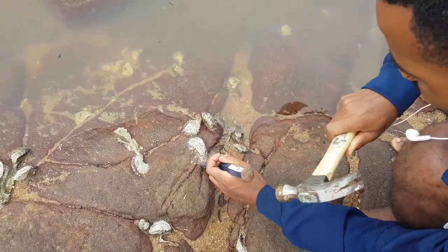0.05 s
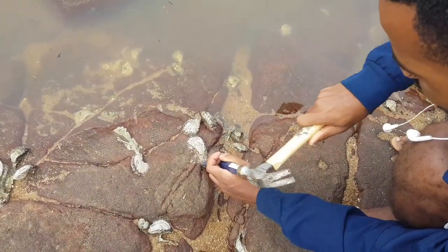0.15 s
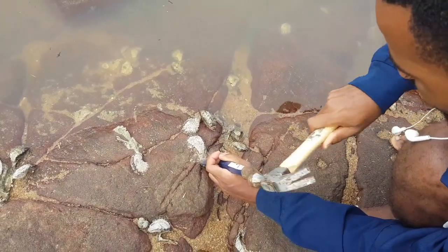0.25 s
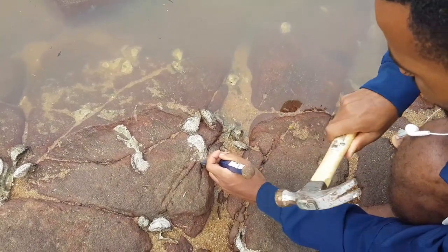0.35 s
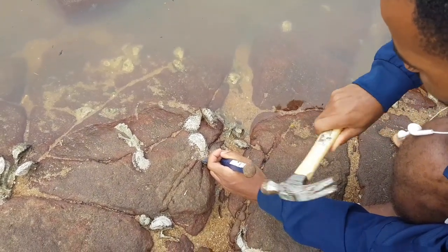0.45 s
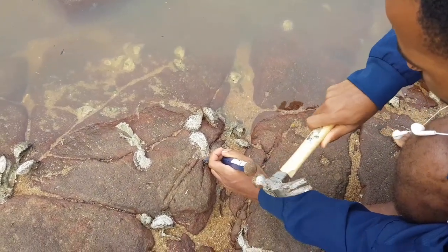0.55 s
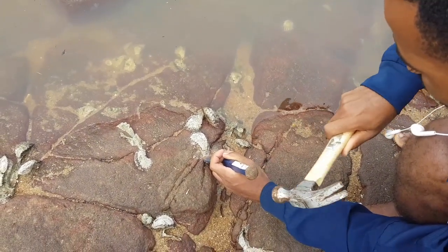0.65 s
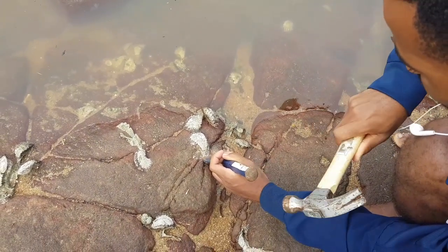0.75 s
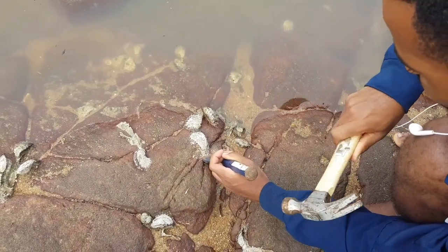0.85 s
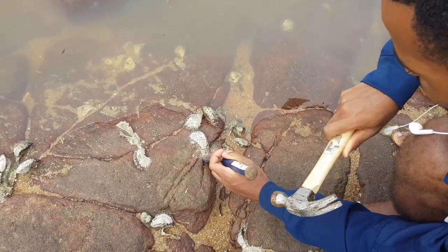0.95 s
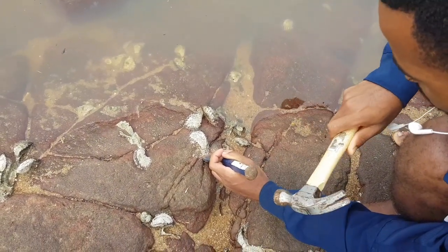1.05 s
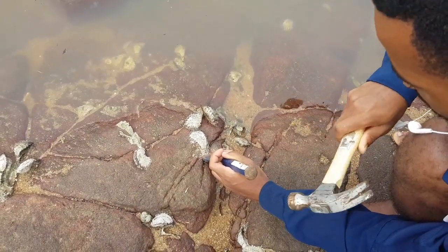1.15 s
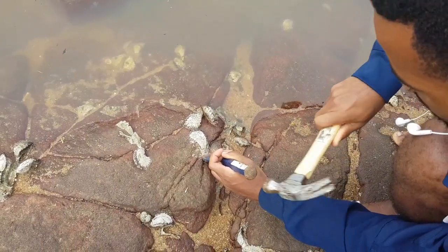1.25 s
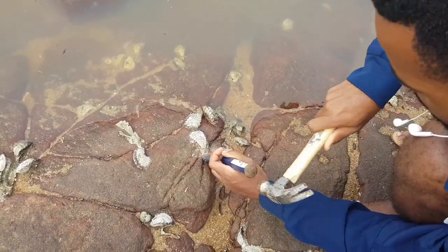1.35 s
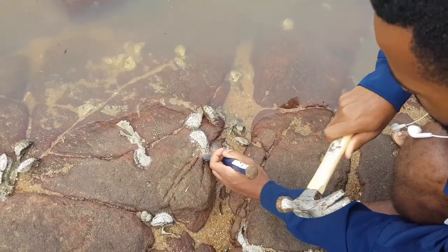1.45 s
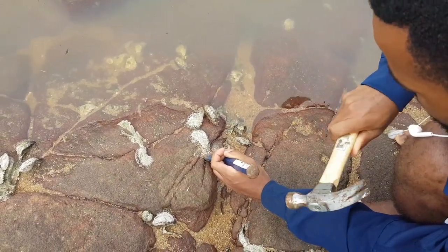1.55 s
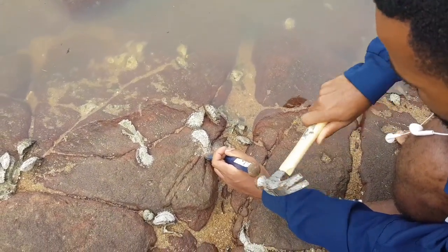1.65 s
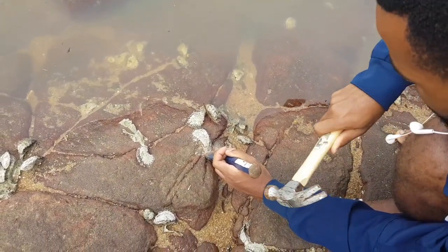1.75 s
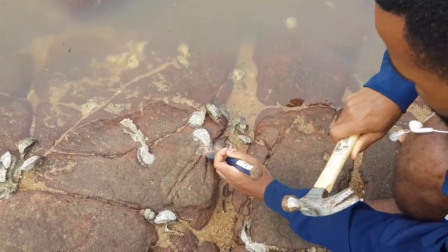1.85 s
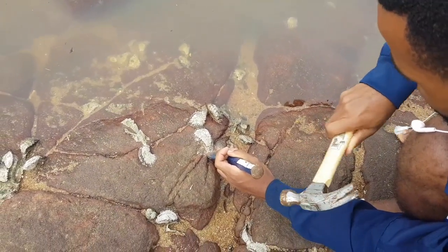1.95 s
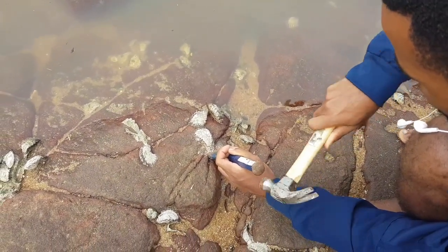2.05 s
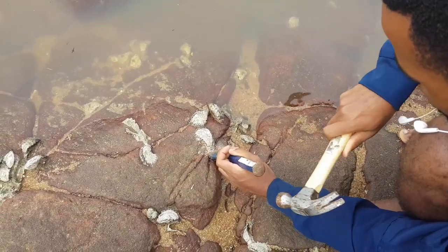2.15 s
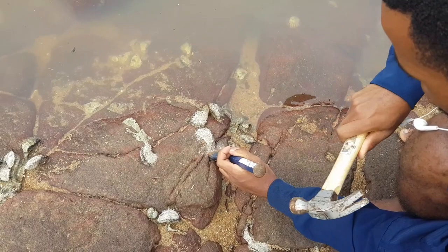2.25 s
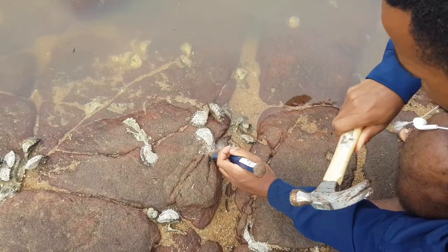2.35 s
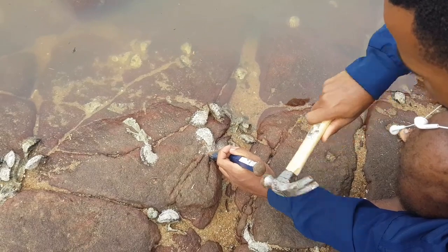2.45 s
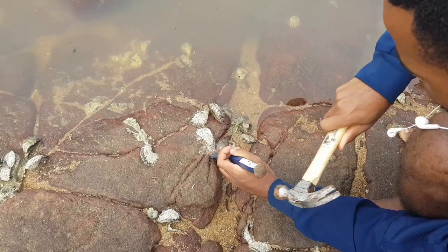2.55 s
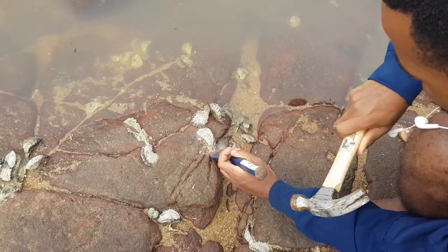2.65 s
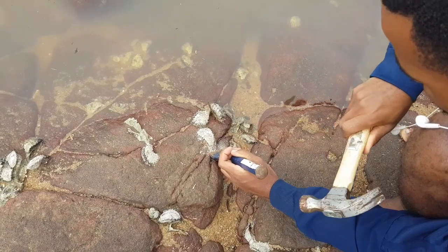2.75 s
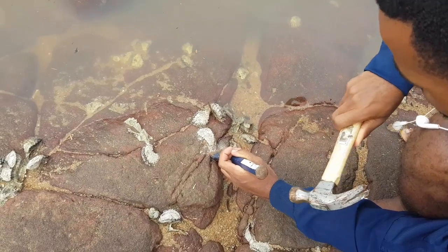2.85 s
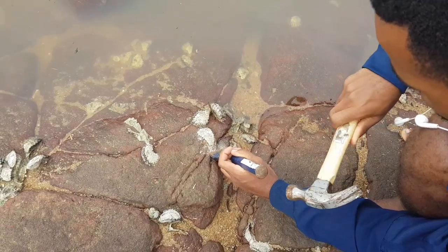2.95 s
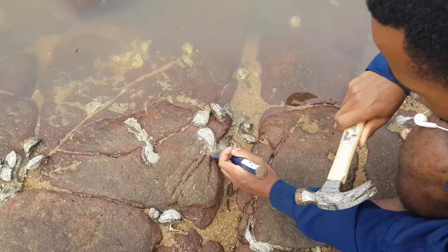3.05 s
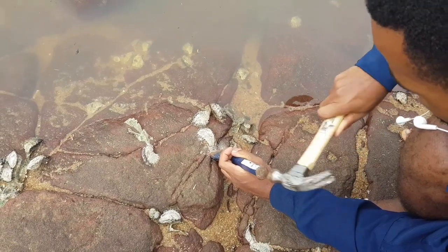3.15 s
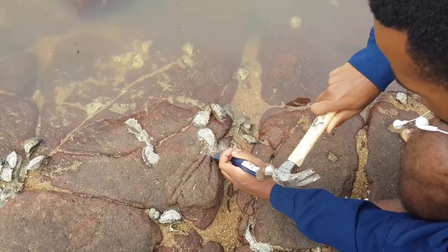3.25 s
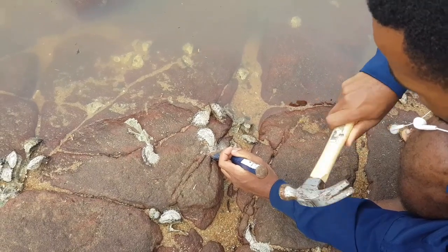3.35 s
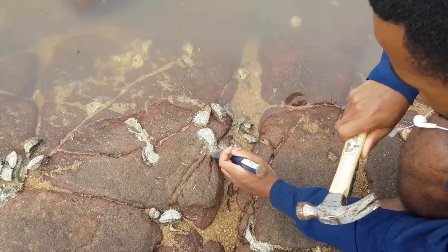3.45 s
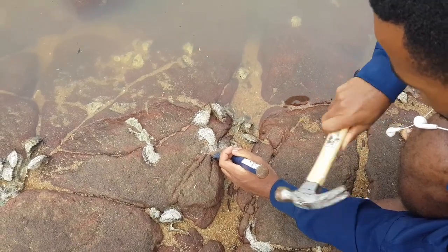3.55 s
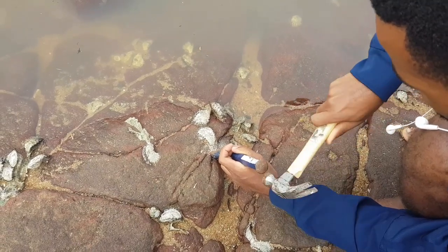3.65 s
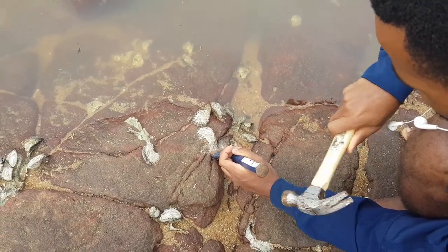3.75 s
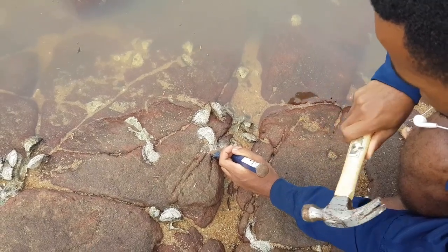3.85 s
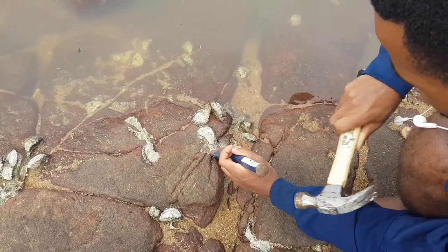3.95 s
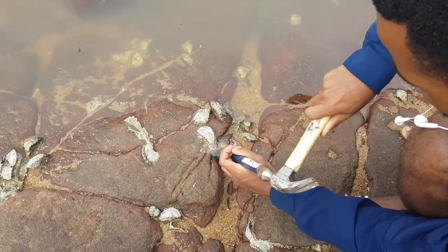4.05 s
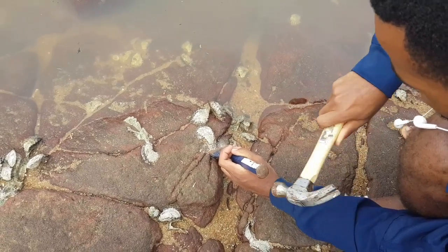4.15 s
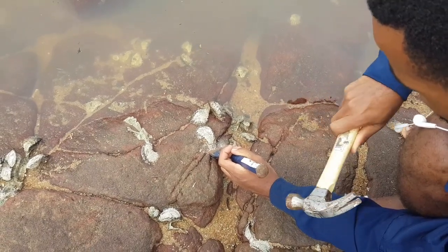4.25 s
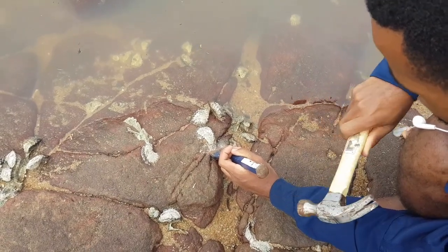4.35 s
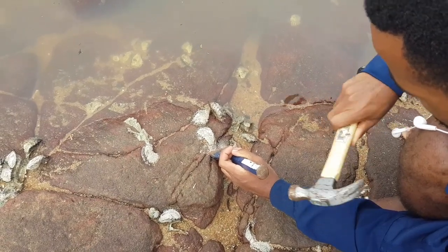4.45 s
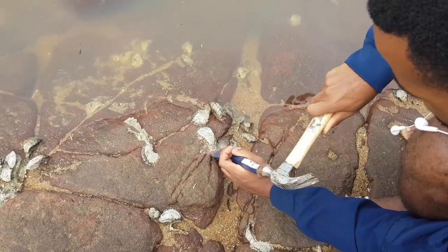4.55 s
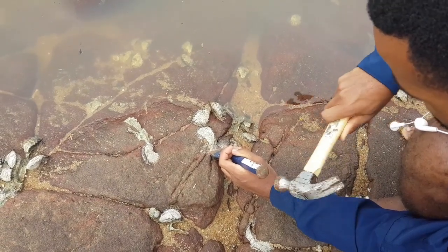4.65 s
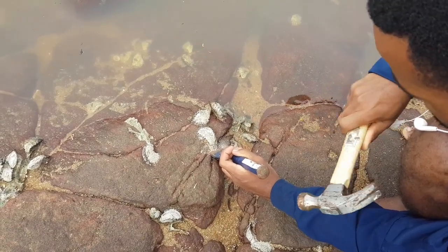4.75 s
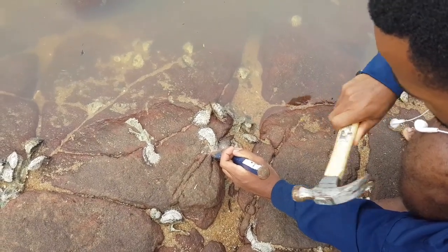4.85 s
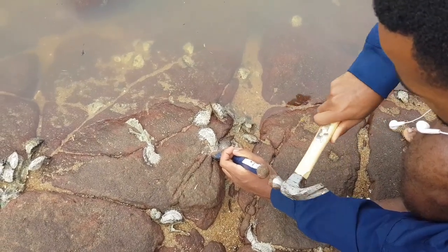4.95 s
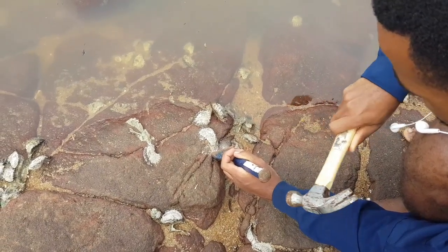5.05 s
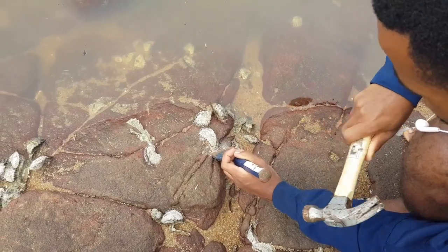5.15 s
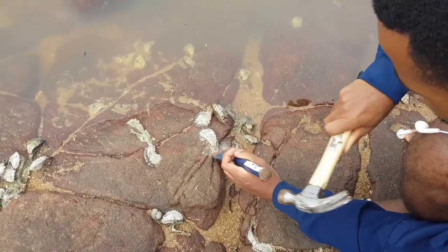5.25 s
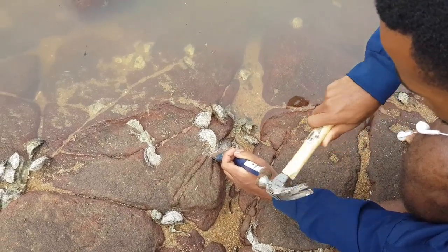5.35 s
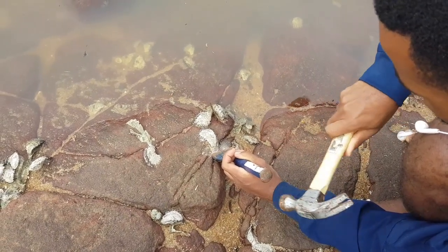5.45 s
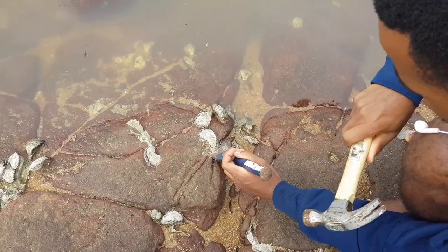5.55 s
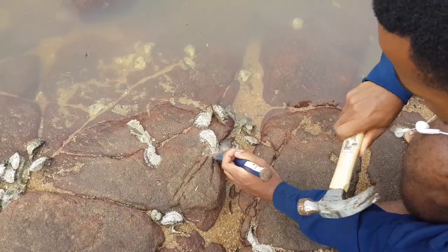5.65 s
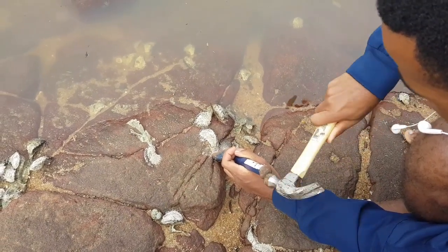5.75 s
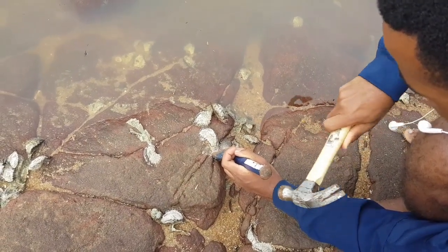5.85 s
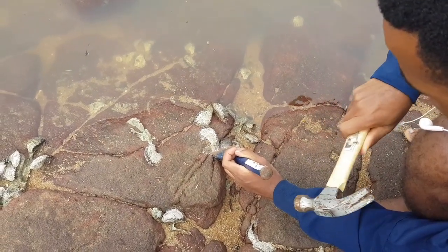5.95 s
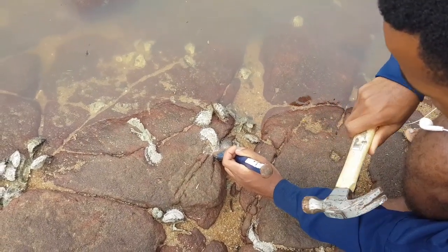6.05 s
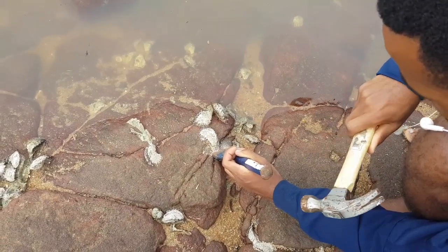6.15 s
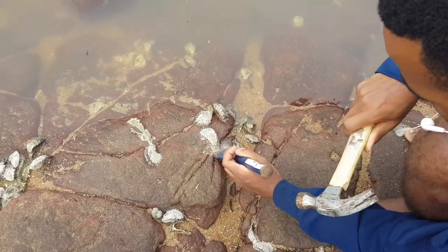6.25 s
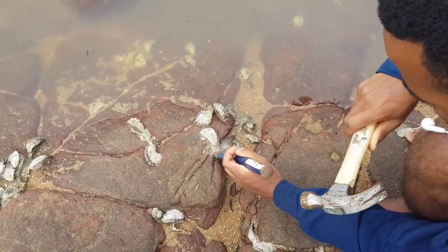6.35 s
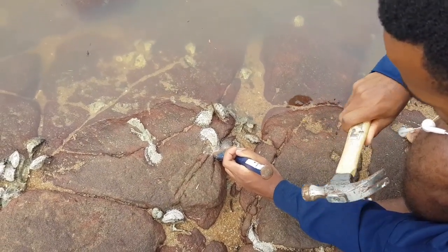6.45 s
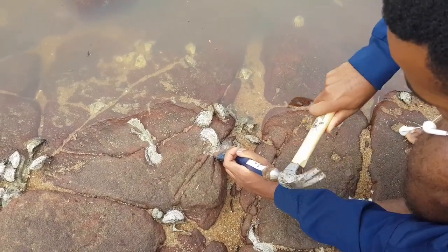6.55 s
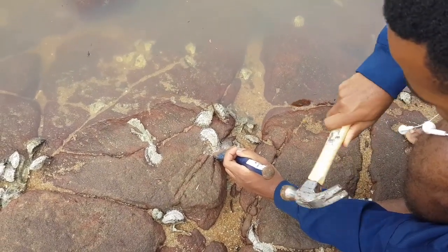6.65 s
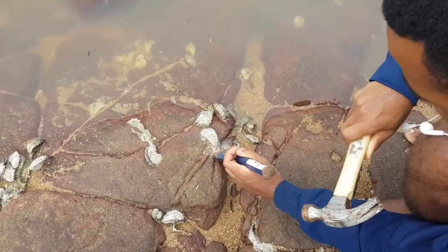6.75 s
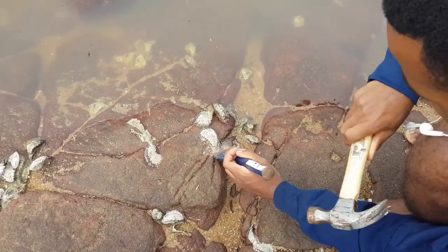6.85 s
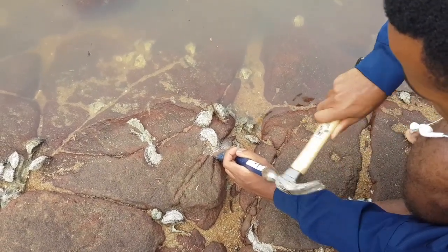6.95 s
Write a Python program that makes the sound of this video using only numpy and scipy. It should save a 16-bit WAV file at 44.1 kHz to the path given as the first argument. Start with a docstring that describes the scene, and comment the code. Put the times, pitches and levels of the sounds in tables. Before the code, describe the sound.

Close, sharp hammer-on-chisel blows at an uneven pace, gritty against stone, some ringing briefly, with soft shore hiss and low wind rumble beneath.

```python
"""A steel hammer drives a hand-held chisel against rock on a calm shore: fourteen close blows, four light rebounds.
Each blow cracks with noise bursts, the chisel chatters on the stone and its damped modes ring briefly in the fist;
the hammer head sings on as decaying sines that beat with their echo.
Under it lie the low wash of the sea and a little wind on the microphone, both shaped from noise."""
import sys
import numpy as np
from scipy import signal
from scipy.fft import rfft, irfft
from scipy.io import wavfile
from scipy.ndimage import uniform_filter1d, minimum_filter1d

SR = 44100
rng = np.random.default_rng(int(sys.argv[2]) if len(sys.argv) > 2 else 0)


def digitize_waveform(pressure):
    """Quantize a signal to 16-bit integers and store it at the path in sys.argv[1].

    Rows of a 2-D input are taken as channels; values are limited to [-1, 1].
    """
    field = np.atleast_2d(pressure).T
    bounded = np.clip(field, -1, 1)
    quanta = np.round(bounded * 32767).astype(np.int16)
    wavfile.write(sys.argv[1], SR, quanta)


N = 309040
BLOW_T = np.arange(SR // 4) / SR  # time since a blow [s]

# one row a blow; the way the tip sits in the rock favours or stifles the modes around one pitch:
# (time [s], force [dB], squareness of the hit [dB], length of the bite [s], seat pitch [Hz],
#  seat boost [dB], knock of the rock before its trim [dB])
HAMMER_BLOWS = [(0.2128, 1, -1, 0.0059, 8800, 2.5, -37), (0.5779, 1.5, 2, 0.0064, 6700, 1, -35),
                (1.3723, 1.16, -2.5, 0.007, 5770, -15, -37.5), (1.7268, 0.9, 9, 0.0067, 6700, 4.5, -30.5),
                (2.1055, 1, 7.5, 0.0041, 8300, -4.5, -38), (2.5198, 0, 4, 0.0072, 12500, 4.5, -38),
                (3.2578, -0.5, -11.5, 0.0071, 2860, 8, -40.5), (3.6732, 0.5, 8.5, 0.004, 8750, 1, -40),
                (4.1089, -1.5, -3, 0.008, 9900, 5.5, -41), (4.5916, 0.1, -14, 0.0051, 6700, -2.5, -40.5),
                (4.9864, -1.1, 0, 0.0072, 12400, 2, -42.5), (5.3714, -1.5, 4, 0.0062, 5360, 4.5, -37.5),
                (5.8045, 1, 7, 0.0051, 10220, 3.5, -34.5), (6.6176, -0.5, -8.5, 0.006, 9600, 8.5, -30)]
# the hammer drops back on the chisel: (time [s], level before the ring and stone trims [dB])
HAMMER_REBOUNDS = [(4.144, -21), (4.620, -26.5), (5.851, -25.5), (6.657, -19.5)]
# modes of the chisel on the rock: (nominal frequency [Hz], level [dB], t60 [s], left over right [dB],
#  lead of the left port [rad], share of energy woken by the first kick [0-1])
CHISEL_MODES = [(1553, -36, 0.0086, 1, -1.65, 0.77), (1957, -32.5, 0.065, -6, 1.8, 1),
                (2300, -27, 0.015, -6.5, -0.8, 0.7), (2730, -39.5, 0.075, -3, 2.2, 0.4),
                (2945, -37, 0.041, -4, -0.1, 0.5), (3410, -47, 0.069, -1.5, 2.7, 0.12),
                (4866, -24, 0.052, -6.5, 1.2, 0.5), (5070, -19, 0.058, -5.5, -1, 0.25),
                (5394, -20.5, 0.062, -5.5, 3, 0.7), (5704, -28.5, 0.099, -5, 2.1, 0.36),
                (6570, -26.0, 0.025, -0.5, -1.7, 0.3), (6720, -21.5, 0.068, -4.5, -2, 0.5),
                (8270, -25.5, 0.021, 6, -1.95, 0.9), (8720, -30.5, 0.078, 0, -2, 0.1),
                (9140, -43, 0.057, 0.5, -2.7, 0), (9680, -24.5, 0.046, -5, 4.5, 0.12),
                (9580, -34, 0.057, -9, 0.3, 0.12), (10700, -19, 0.057, -4.5, -0.1, 0),
                (11630, -27, 0.034, -3, 3.3, 0.77), (11490, -22.5, 0.073, -0.5, 1, 0.1),
                (11630, -33.5, 0.085, -1, 0.9, 0.24), (12510, -26.5, 0.069, -3.5, 3.5, 0.18)]
# a square hit sets the steel ringing, a glancing one spends itself on the stone:
# (frequency [Hz], mode level per dB of squareness [dB/dB])
SQUARE_HIT_TILT = [(2500, -0.18), (5200, 0.0), (6700, -0.05), (9000, -0.12), (10700, 0.3), (12000, -0.07)]
# crack of the contact: (frequency [Hz], relative density [dB per Hz])
CRACK_SPECTRUM = [(200, -17), (600, 3), (1100, -10), (1400, 1), (2300, -1.5), (3500, -1.5), (6000, -1.5),
                  (7500, -5), (9000, -8), (12000, -5), (14000, -11.5), (15500, -34.5)]
# crushing of grit: (frequency [Hz], relative density [dB per Hz])
GRIT_SPECTRUM = [(150, -29), (1000, -12), (1350, -2.5), (2400, 1), (3400, -0.5), (4300, -4), (6500, 2.5),
                 (7500, -8), (9200, -5.5), (11800, 0), (13200, -10), (14400, -19), (15500, -33.5)]
# knock of the rock: (frequency [Hz], relative density [dB per Hz])
KNOCK_SPECTRUM = [(80, -12.5), (250, -5), (500, -5.5), (720, -3.5), (1050, -12), (2000, -25), (5000, -55.5)]
# modes of the hammer head: (frequency [Hz], relative level [dB], t60 [s])
HEAD_MODES = [(6448, -0.5, 0.3), (10720, -17.5, 0.13), (11400, -8.5, 0.099)]
# sea wash: (frequency [Hz], relative density [dB per Hz])
SEA_SPECTRUM = [(240, -1.55), (340, 2), (450, -0.64), (620, -6), (850, -7.5), (1150, -15.5), (1600, -15),
                (2400, -15.5), (3500, -25.5), (5200, -20.5), (7600, -26.5), (11000, -23.5), (13000, -31.5),
                (14400, -39.5)]
# likeness of the two ports in steady noise: (frequency [Hz], correlation [-1 to 1])
PORT_LIKENESS = [(60, 0.144), (300, 0.46), (640, 0.45), (1400, -0.37), (3000, 0.036), (15000, 0)]
# wind on the microphone: (frequency [Hz], relative density [dB per Hz])
WIND_SPECTRUM = [(15, -23), (35, -8.5), (65, 0), (110, -3), (180, -8), (300, -22), (700, -46), (2000, -87)]
# stronger gusts: (time of the peak [s], length [s], level over the breeze [dB])
GUSTS = [(0.07, 0.067, 9), (0.224, 0.21, 6), (0.739, 0.12, 9.5), (1.054, 0.07, 7), (1.65, 0.21, 6),
         (2.46, 0.072, 9.5), (5.537, 0.08, 7.5), (5.677, 0.073, 10), (6.1, 0.22, 7.5)]

SEAT_OCTAVES = 0.163  # spread of the band of modes that the seat favours or stifles
HEAD_DB = -30  # start of the hammer head's ring at squareness and force 0 dB
REBOUND_HZ, REBOUND_TILT_DB = 5500, -15  # a soft contact wakes less treble: dB per octave above this pitch
SEA_DB = -47.5  # wash before the hiss trim and the swell
BREEZE_DB, BREEZE_DB_PER_S = -46.5, -0.3  # the breeze slowly drops


def hammering(stone_per_square=-0.1467, rebound_ring_db=2.0, rebound_stone_db=4.5, rebound_bite_s=0.0018):
    """Every blow excites chisel, stone, rock and head; light rebounds wake only a duller chisel and stone."""
    out = np.zeros((2, N))
    for s, force_db, square_db, bite_s, seat_hz, seat_db, knock_db in HAMMER_BLOWS:
        ring = chisel(woken(square_db, seat_hz, seat_db), bite_s)
        crush = from_db(stone_per_square * square_db) * stone()
        blow = ring + crush + knock(knock_db) + hammer_head(HEAD_DB + square_db)
        add(out, s, from_db(force_db) * blow)

    mode_hz = np.array(CHISEL_MODES)[:, 0]
    soft_db = REBOUND_TILT_DB * np.maximum(np.log2(mode_hz / REBOUND_HZ), 0)
    for s, db in HAMMER_REBOUNDS:
        ring = from_db(rebound_ring_db) * chisel(soft_db, rebound_bite_s)
        crush = from_db(rebound_stone_db) * stone()
        add(out, s, from_db(db) * (ring + crush))
    return out


def chisel(woken_db, chatter_s, contact_s=0.0006, detune=0.003, scatter_db=3.5):
    """The kick of the hammer, then the chatter of the tip as it bites, drive the modes; the fist damps them."""
    bite = BLOW_T / chatter_s
    chatter = port_noise(same=0.8) * bite * np.exp(-bite ** 2 / 2)
    push = 1 - np.exp(-BLOW_T / contact_s)  # the kick builds while the hammer stays in touch
    out = np.zeros_like(chatter)
    for (hz, db, t60, side_db, left_lead, kicked), wake_db in zip(CHISEL_MODES, woken_db):
        grip = 1 + detune * rng.standard_normal()  # the grip shifts the modes a little
        phase = rng.uniform(0, 2 * np.pi) + np.array([[left_lead], [0]])
        mode = np.sin(2 * np.pi * hz * grip * BLOW_T + phase) * fade(t60)
        driven = signal.fftconvolve(chatter, mode, axes=1)[:, :len(BLOW_T)]
        kick_ring = np.sqrt(kicked) * unit_burst(push * mode)
        chatter_ring = np.sqrt(1 - kicked) * unit_burst(driven)
        chance_db = scatter_db * (2 * rng.random() - 1)  # no two blows land on the same spot
        level = from_db(db + wake_db + chance_db)
        out += level * pan(side_db) * unit_burst(kick_ring + chatter_ring)
    radiation = signal.butter(4, 1200, "high", fs=SR, output="sos")
    return signal.sosfilt(radiation, out)  # a thin bar radiates almost no bass


def woken(square_db, seat_hz, seat_db):
    """How hard a blow wakes each chisel mode [dB], from its squareness and the seat of the tip."""
    hz = np.array(CHISEL_MODES)[:, 0]
    seat_band = np.exp(-(np.log2(hz / seat_hz) / SEAT_OCTAVES) ** 2 / 2)
    return square_db * read(SQUARE_HIT_TILT, hz) + seat_db * seat_band


def stone(crack_db=-27.5, crack_t60=0.014, grit_db=-24, grit_t60=0.09, grit_rise_s=0.0056):
    """The contact cracks as a sharp noise burst; crushed grit follows as a grainy, slower one."""
    crack = colour(port_noise(same=0.68) * fade(crack_t60), CRACK_SPECTRUM)
    crush = grains(size_db=3.5) * fade(grit_t60) * (1 - np.exp(-BLOW_T / grit_rise_s))
    grit = colour(port_noise(same=0.24) * crush, GRIT_SPECTRUM)
    crack_out = from_db(crack_db) * pan(db=-3.0) * unit_burst(crack)
    return crack_out + from_db(grit_db) * pan(db=1.0) * unit_burst(grit)


def grains(size_db, size=30):
    """Uneven strength of the tiny contacts, each under a millisecond long (size in samples)."""
    return from_db(size_db * unit_rms(uniform_filter1d(rng.standard_normal(len(BLOW_T)), size)))


def knock(db, t60=0.021, trim_db=-2.5):
    """The dull push of the blow into the rock, a short low noise burst."""
    burst = colour(port_noise(same=0.71) * fade(t60), KNOCK_SPECTRUM)
    return from_db(db + trim_db) * unit_burst(burst)


def hammer_head(db, echo=0.79, beat_hz=15):
    """The head rings on; as it lifts, its echo off the rock is Doppler-shifted and beats with it."""
    lift = beat_hz * BLOW_T - 0.89 * rng.random((2, 1))  # echo phase in cycles of the first mode
    out = np.zeros((2, len(BLOW_T)))
    for hz, mode_db, t60 in HEAD_MODES:
        beat = lift * hz / HEAD_MODES[0][0]  # the shift grows with pitch
        direct = np.sin(2 * np.pi * hz * BLOW_T)
        reflected = echo * np.sin(2 * np.pi * (hz * BLOW_T + beat))
        out += from_db(mode_db) * (direct + reflected) * fade(t60)
    return from_db(db) * pan(db=-10.0) * out


def shore(x, db=-41, t60=0.33):
    """The open shore scatters only a faint, short noise tail back."""
    tail = port_noise(same=0) * fade(t60) * (1 - fade(.1))
    tail /= np.linalg.norm(tail, axis=1, keepdims=True)
    return x + from_db(db) * signal.fftconvolve(x, tail, axes=1)[:, :N]


def sea(swell_db=1.16, low_hz=230, lap_hz=800, hiss_db=-0.56):
    """The steady hiss of far surf; only the low lapping of shallow water swells and sinks."""
    low_cut = signal.butter(2, low_hz, "high", fs=SR, output="sos")
    wash = unit_rms(signal.sosfilt(low_cut, steady_noise(SEA_SPECTRUM)))
    lapping = signal.sosfiltfilt(signal.butter(2, lap_hz, fs=SR, output="sos"), wash)
    hiss = wash - lapping
    swell = from_db(swell_db * wander(slow_hz=2, fast_hz=20))
    return from_db(SEA_DB) * pan(db=-0.6) * (from_db(hiss_db) * hiss + swell * lapping)


def wind(buffet_db=2.5):
    """A dropping breeze with a few gusts buffets the ports as low noise of wandering level."""
    t = np.arange(N) / SR
    gusts_db = sum(db * np.exp(-(2 * (t - s) / length) ** 2) for s, length, db in GUSTS)
    breeze_db = BREEZE_DB + BREEZE_DB_PER_S * t
    level_db = breeze_db + gusts_db + buffet_db * wander(slow_hz=3, fast_hz=13)
    return from_db(level_db) * pan(db=1.5) * unit_rms(steady_noise(WIND_SPECTRUM))


def wander(slow_hz, fast_hz, count=24):
    """Random motion at rms 1, summed from sines between two rates."""
    t = np.arange(0, N + 256, 256) / SR
    rates = np.geomspace(slow_hz, fast_hz, count)[:, None]
    motion = np.sum(np.sin(2 * np.pi * (rates * t + rng.random((count, 1)))), 0)
    return unit_rms(follow(np.transpose([t, motion])))


def steady_noise(spectrum):
    """Scene-long stereo noise of a given spectrum, partly alike in both ports."""
    hz = np.fft.rfftfreq(N, 1 / SR)
    a, b = rfft(rng.standard_normal((2, N)))
    return irfft(part_alike(a, b, read(PORT_LIKENESS, hz)) * from_db(read(spectrum, hz)), N)


def port_noise(same):
    """Blow-long noise at the two microphone ports, alike to the given degree."""
    a, b = rng.standard_normal((2, len(BLOW_T)))
    return part_alike(a, b, same)


def part_alike(a, b, same):
    """Mixes two independent noises into a stereo pair of the given correlation."""
    return np.array([a, same * a + np.sqrt(1 - same ** 2) * b])


def colour(x, spectrum, size=2048):
    """Causal minimum-phase filter with the given spectrum, so that attacks stay sharp."""
    log_gain = np.log(from_db(read(spectrum, abs(np.fft.fftfreq(size, 1 / SR)))))
    taps = np.fft.ifft(np.exp(np.conj(signal.hilbert(log_gain)))).real
    return signal.fftconvolve(x, taps[None, :size // 2], axes=1)[:, :x.shape[1]]


def read(points, hz):
    """Reads a spectrum on a log-frequency axis."""
    f, value = np.transpose(points)
    return np.interp(np.log(hz + 1), np.log(f + 1), value)


def follow(curve):
    """A curve of (time, value) points at every sample."""
    return np.interp(np.arange(N) / SR, *np.transpose(curve))


def fade(t60):
    """Exponential decay by 60 dB in t60 seconds."""
    return np.exp(-np.log(1000) * BLOW_T / t60)


def pan(db):
    """Left and right gains that differ by db; the further apart they are, the lower the total power."""
    return from_db(np.array([[db], [-db]]) / 2) / np.sqrt(np.cosh(db * np.log(10) / 10))


def add(mix, s, sound):
    """Lays a sound into the mix at s seconds, cut at the end."""
    part = mix[:, round(s * SR):][:, :sound.shape[1]]
    part += sound[:, :part.shape[1]]


def from_db(db):
    """Decibels to amplitude."""
    return 10 ** (np.asarray(db) / 20)


def unit_rms(x):
    """Scales the whole signal to rms 1."""
    return x / np.sqrt(np.mean(x ** 2) + 1e-20)


def unit_burst(x):
    """Scales each channel to the energy of 20 ms at rms 1."""
    return x / np.sqrt(np.sum(x ** 2, -1, keepdims=True) / (.02 * SR) + 1e-20)


def scene():
    """Blows with their short tail, over sea and wind."""
    return shore(hammering()) + sea() + wind()


def record(dry, ceiling=.94):
    """A fast limiter holds down peaks over the ceiling; then a low-pass limits the band."""
    headroom = np.minimum(ceiling / (abs(dry).max(0) + 1e-9), 1)
    gain = uniform_filter1d(minimum_filter1d(headroom, size=45), size=45)  # about 1 ms
    taps = signal.firwin(255, 14700, window=("kaiser", 8), fs=SR)
    return signal.oaconvolve(dry * gain, taps[None], "same", axes=1)


dry = scene()
out = record(dry)
digitize_waveform(out)
```